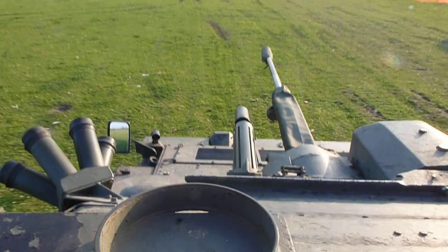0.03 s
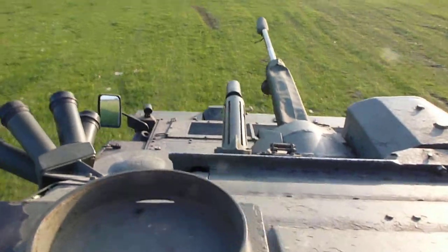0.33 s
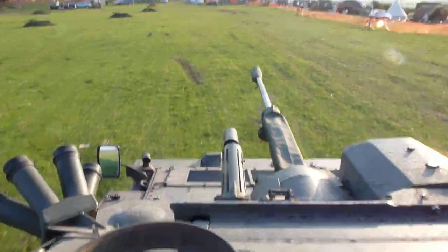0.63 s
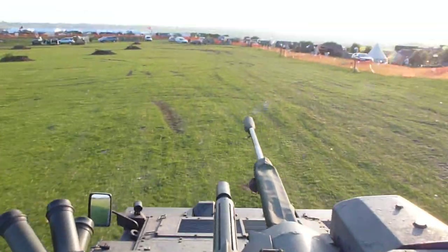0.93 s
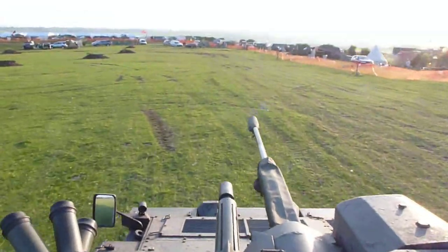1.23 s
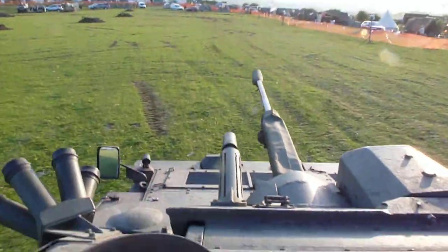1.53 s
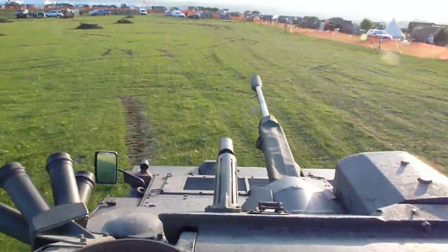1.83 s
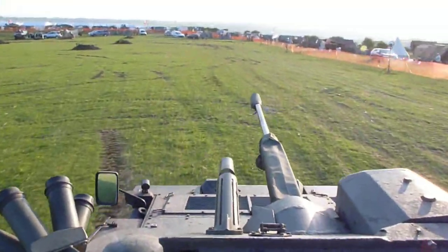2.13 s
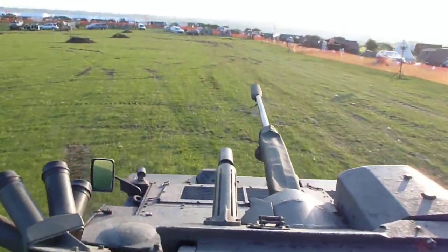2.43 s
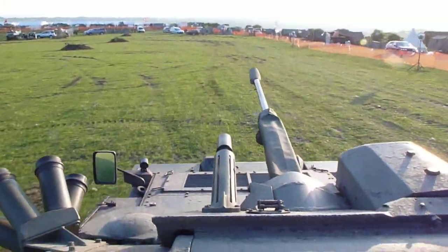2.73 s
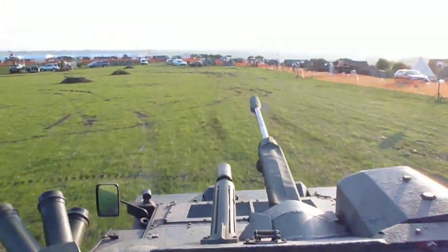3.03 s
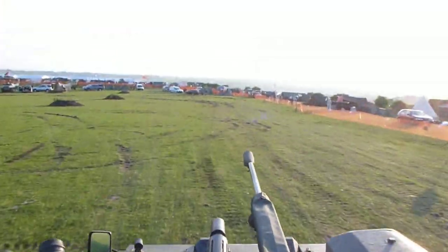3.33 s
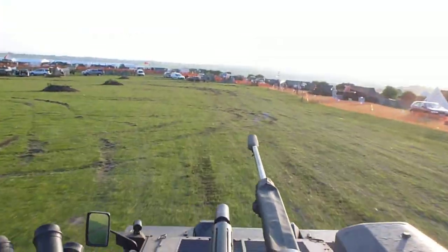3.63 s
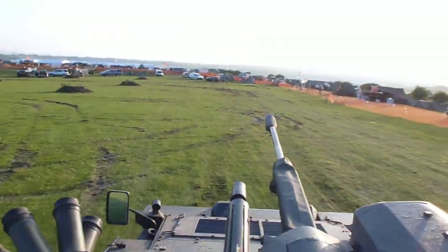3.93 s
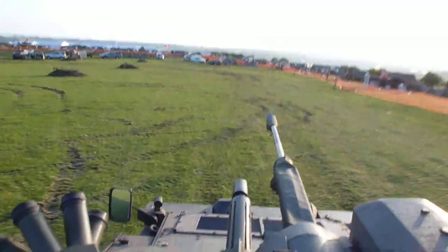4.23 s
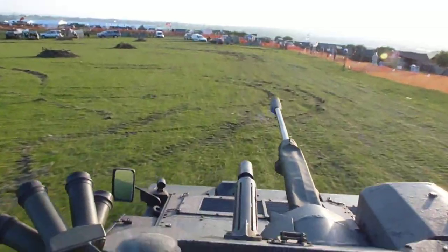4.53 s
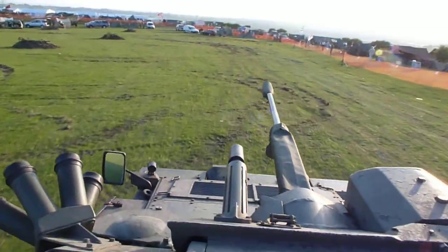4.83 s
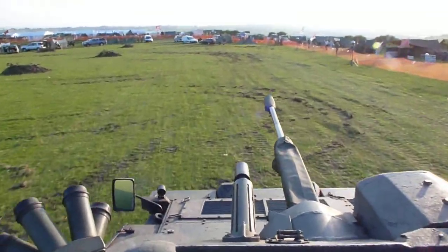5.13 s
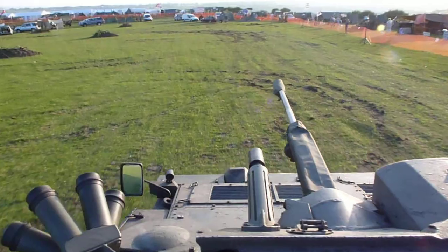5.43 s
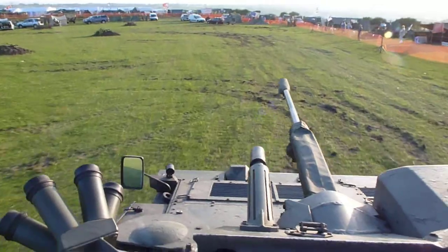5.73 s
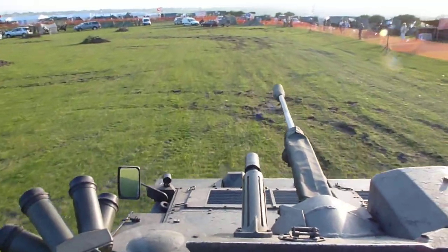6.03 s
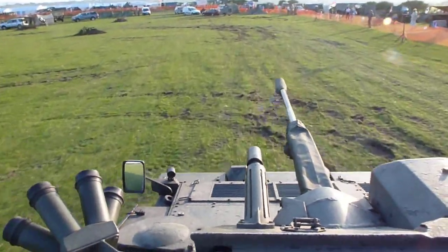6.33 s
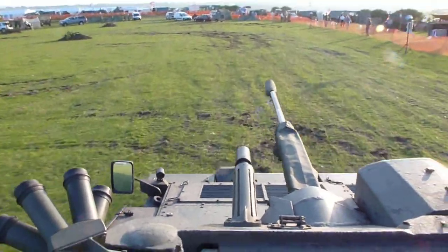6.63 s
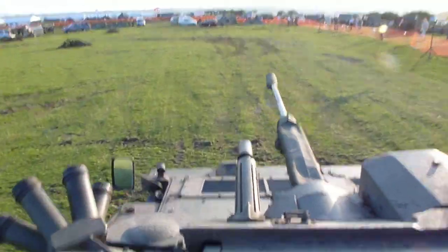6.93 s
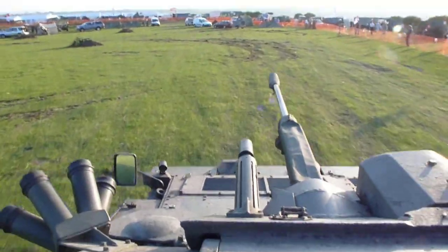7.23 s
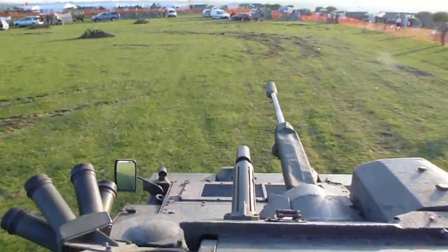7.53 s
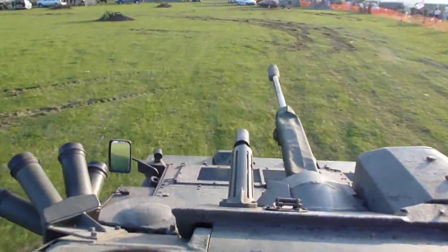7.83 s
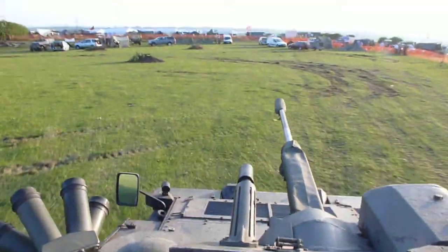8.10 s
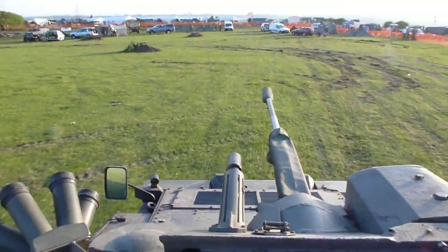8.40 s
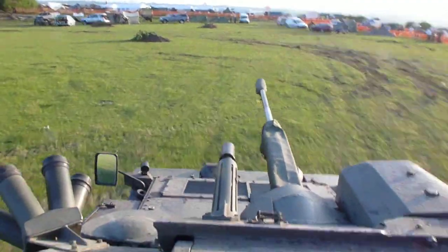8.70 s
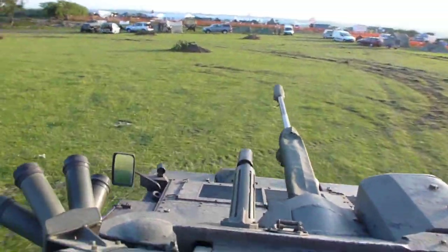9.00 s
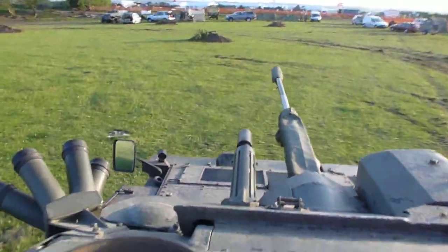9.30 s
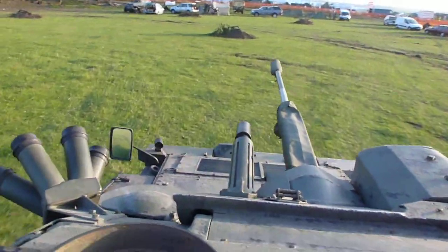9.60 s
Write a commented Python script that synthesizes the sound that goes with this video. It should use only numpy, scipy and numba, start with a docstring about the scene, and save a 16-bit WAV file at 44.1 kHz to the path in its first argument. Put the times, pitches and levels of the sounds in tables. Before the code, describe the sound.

Heard from on board, a tank's deep engine rises and falls over rumbling, clanking tracks and gusts of wind on the microphone.

```python
"""The engine of a tracked armoured vehicle, heard from the turret top as it crosses a bumpy field.
Its firings make a deep exhaust note that speeds up, burbles off load and then pulls again.
Gear teeth whine, and the tracks rattle and clank through the hull, scrape on soil and squeal.
Wind buffets the microphone, and the strongest gusts make its gain control turn the sound down."""
import sys
import numpy as np
from scipy import signal
from scipy.fft import rfft, irfft, next_fast_len
from scipy.io import wavfile
from scipy.ndimage import uniform_filter1d, map_coordinates
from numba import njit

SR = 44100
rng = np.random.default_rng(int(sys.argv[2]) if len(sys.argv) > 2 else 0)


def wrap_up_sound(samples):
    """Save the sound to the file named by the first command line argument, as 16-bit audio."""
    columns = np.atleast_2d(samples).T
    # keep every value between -1 and 1, then stretch to whole-number steps
    tamed = np.clip(columns, -1, 1)
    steps = np.round(tamed * 32767).astype(np.int16)
    wavfile.write(sys.argv[1], SR, steps)


N = 426006

# engine speed: t/s, firing rate/Hz
FIRING_RATE = [(0, 78.7), (.8, 79), (1.4, 86.6), (1.75, 89), (2.0, 91.5), (2.1, 93.7), (2.28, 95.4),
               (2.45, 98), (2.85, 102), (3.05, 100), (3.3, 99.2), (3.72, 111.4), (3.87, 112.4),
               (4.08, 105.7), (4.3, 108.5), (4.58, 114), (4.8, 114.5), (5.2, 112), (5.7, 110), (6.2, 104.6),
               (7.0, 99), (8.2, 92), (8.9, 91.7), (9.1, 90.3), (9.66, 88.6)]
# how hard the engine works: t/s, load from 0 to 1
ENGINE_LOAD = [(0, 0.25), (.85, 0.64), (1.1, 0.7), (1.8, 0.71), (2.3, 0.86), (2.95, 0.69), (4.1, 0.85),
               (4.7, 0.88), (4.88, 0.06), (5.5, 0.46), (6.2, 0.42), (7.8, 0.4), (8.3, 0.3), (8.95, 0.69),
               (9.66, 0.6)]
# exhaust tones: multiple of the firing rate, level when even/dB, level when lumpy/dB
EXHAUST_TONES = [(.5, -9, -4), (1, 1.5, -7), (1.5, -5, -.5), (2, -2, -6.5), (2.5, -7, -7), (3, -13, -16.5)]
# how the silencer favours some pitches: f/Hz, gain/dB
SILENCER_GAIN = [(40, -14.5), (51, -5.5), (80, 4.5), (108, 1), (119, 2), (138, -7.5), (158, -4),
                 (172, -0.5), (186, 1.5), (203, -3.5), (216, -2), (228, -5), (250, -4.5), (330, -14)]
# where gas rings in the silencer: f/Hz, width/Hz, gain/dB
BURBLE_MODES = [(92, 32, -4), (179, 44, 2), (236.3, 32, 1)]
# gear pairs sing out: peak t/s, half length/s, low pair/dB, middle pair/dB, high pair/dB
GEAR_WHINES = [(1.93, .13, -58, -53, -62), (2.22, .11, -56, -44.5, -52.5), (2.52, .18, -55, -49, -56),
               (3.15, .25, -54, -51.5, -59), (3.66, .2, -43.5, -60, -68), (4.12, .12, -46, -62, -68),
               (4.53, .14, -42, -60, -70), (8.7, .28, -56, -46, -52), (9.3, .25, -58, -50, -60)]
# where the hull plates ring: f/Hz, width/Hz, gain/dB
HULL_MODES = [(400, 48, 8.5), (533, 9.7, 7.5), (583, 17, 7.5), (766, 32, 10), (934, 52, 11.5),
              (1303, 70, 5.5), (1433, 49, 6), (1910, 72, -0.5), (2086, 69, -2), (3120, 25, -14)]

# how loud the tracks run: t/s, rolling level/dB, link clatter level/dB
TRACK_LEVELS = [(0, -35.5, -44), (.9, -32.5, -44), (1.4, -38.5, -46), (2.3, -36, -43.5), (3.1, -41, -45),
                (3.45, -39, -51), (3.72, -37, -46.5), (3.95, -36, -51), (5.1, -38.5, -49),
                (6.25, -35, -44.5), (6.65, -37, -50.5), (7.15, -35.5, -44.5), (8.9, -34, -41.5),
                (9.66, -36, -48)]
# deep rumble of the wheels: f/Hz, level/dB
RUMBLE_SPECTRUM = [(20, -24.5), (35, -11), (50, -3), (68, -5.5), (90, 3.5), (130, -0.5), (180, 2),
                   (245, -2), (310, -11.5), (500, -20.5), (1000, -66.5)]
# wheels rolling on the track: f/Hz, level/dB
ROLLING_SPECTRUM = [(100, -11.5), (250, -4.5), (380, 4.5), (550, -1.5), (850, -5), (1120, -10),
                    (1700, -17.5), (3000, -24), (7000, -55)]
# scraping soil: f/Hz, level/dB
SCRAPE_SPECTRUM = [(700, 1.5), (2000, -4), (3200, 1), (4200, -1.5), (5300, -8.5), (6400, -15), (7300, -22)]
# clods grind through the tracks: peak t/s, half length/s, level/dB
CLOD_SCRAPES = [(.43, .022, -46), (.475, 0.045, -46.5), (.6, .05, -53), (.75, 0.041, -46), (.94, .04, -55),
                (1.3, 0.22, -63.5), (2.05, .03, -59), (2.21, .03, -54), (2.33, 0.028, -51),
                (2.44, .03, -57), (2.58, .03, -56), (2.94, .05, -55.5), (3.09, 0.04, -54),
                (3.21, .035, -56), (3.33, .04, -60), (3.76, 0.026, -53.5), (4.2, 0.26, -60.5),
                (4.7, 0.14, -58.5), (5.29, 0.05, -56), (5.55, .025, -58), (5.66, .025, -56),
                (5.76, 0.05, -52.5), (5.86, .05, -56), (6.015, .02, -52), (6.1, 0.035, -47.5),
                (6.185, .018, -53.5), (6.265, 0.03, -49.5), (6.66, .022, -53.5), (6.775, 0.028, -48.5),
                (6.845, 0.016, -49), (7.11, .04, -56), (7.19, 0.043, -43.5), (7.37, 0.035, -55),
                (8.3, 0.16, -64), (8.765, 0.04, -48)]
# the track slaps the hull: t/s, decay/s, level/dB
TRACK_SLAPS = [(7.03, 0.01, -32), (7.105, 0.02, -34), (7.15, 0.016, -31), (7.867, 0.012, -32),
               (8.194, 0.012, -33), (9.204, 0.008, -30.5)]
# force of a slap: f/Hz, level/dB
SLAP_SPECTRUM = [(200, -4.5), (500, 5), (950, 17), (2000, -7), (5000, -21.5)]
# links clink on their pins: t/s, decay/s, level/dB
LINK_CLINKS = [(6.28, .03, -47), (6.375, .025, -45), (6.5, .02, -46), (6.64, .035, -45), (6.83, .03, -47),
               (7.255, .02, -45), (7.3, .02, -43.5), (7.41, .02, -46), (7.915, .035, -44),
               (7.99, .025, -47), (8.3, .025, -44), (8.63, .03, -42), (8.92, .035, -43), (9.15, .03, -43)]
# force of a clink: f/Hz, level/dB
CLINK_SPECTRUM = [(1000, -6), (2200, 0), (2800, -9), (4400, -13), (5400, -20)]
# where the track pins ring: f/Hz, width/Hz, gain/dB
PIN_MODES = [(2115, 60, -4), (2185, 50, -4), (2505, 35, -7), (2810, 55, -5), (3370, 60, -8), (3500, 40, -7),
             (3605, 25, -7), (4400, 70, -7), (5352, 28, -1.5)]
# bumps shake the hull: t/s, decay/s, level/dB
HULL_BUMPS = [(7.19, .07, -27.5), (7.52, .06, -28), (8.2, .05, -31), (9.47, .06, -30)]
# force of a bump: f/Hz, level/dB
BUMP_SPECTRUM = [(60, -14), (120, 0), (200, -14), (500, -40), (2000, -70)]
# the hull's lowest note: f/Hz, width/Hz, gain/dB
BOOM_MODE = [(116, 28, 0)]
# dry pins bind and squeal: peak t/s, half length/s, level/dB
PIN_SQUEALS = [(1.7, .35, -66), (2.45, .22, -61), (3.1, .3, -62), (7.95, .15, -62), (8.35, .12, -59),
               (8.63, .1, -56), (8.9, .11, -51.5), (9.17, .08, -58), (9.45, .15, -62)]
# pitches of a squeal: f/Hz, width/Hz, gain/dB
SQUEAL_MODES = [(2115, 170, -4), (2820, 100, 0), (3500, 60, -4.5), (4400, 100, -4), (5352, 50, -7.5)]

# gusts hit the microphone: t/s, length/s, turbulence/dB, fizz/dB, slow pressure/dB
GUSTS = [(0.019, 0.011, -31, -45, -27.5), (0.2, 0.02, -22.5, -46.5, -11.5),
         (0.254, 0.029, -24.5, -41.5, -24), (0.302, 0.059, -22.5, -39, -32.5),
         (0.367, .135, -24.5, -41, -41.5), (0.508, 0.038, -22.5, -44, -38), (0.559, 0.035, -21.5, -41, -34),
         (0.602, 0.011, -25.5, -42.5, -32), (0.643, 0.044, -21, -37.5, -29.5),
         (0.69, 0.033, -19.5, -37.5, -23), (0.747, 0.024, -20.5, -43, -25),
         (1.584, 0.027, -27, -42.5, -14.5), (2.604, 0.06, -23.5, -42, -22.5), (4.185, 0.037, -30, -49, -15),
         (4.208, 0.0098, -20, -32.5, -21.5), (4.698, 0.023, -20.5, -39.5, -18.5),
         (4.749, 0.025, -21, -34.5, -20), (4.784, 0.055, -27.5, -38, -15.5), (5.73, 0.11, -36, -50.5, -30),
         (7.131, 0.054, -39.5, -55, -18), (7.189, 0.055, -28, -43.5, -32),
         (7.498, 0.049, -22.5, -48.5, -27.5), (7.616, 0.034, -23, -41, -13.5),
         (7.694, 0.028, -26.5, -40.5, -36), (9.054, 0.01, -21, -55, -25), (9.512, 0.0084, -24, -43, -18),
         (9.61, 0.023, -28.5, -54.5, -32)]
# low flutter of the wind: f/Hz, level/dB
WIND_SPECTRUM = [(30, -12.5), (120, 3.5), (250, 4), (500, 1), (800, -4.5), (1300, -12), (2000, -36.5),
                 (3500, -49.5), (7000, -66.5)]
# fizz of a gust: f/Hz, level/dB
FIZZ_SPECTRUM = [(200, -8), (700, -1), (1800, 0), (2700, -6), (3800, -17), (5400, -31), (7000, -44)]
# eddies (small swirls of air) burst: t/s, crackle decay/s, crackle/dB, thump/dB, slow push/dB
EDDY_POPS = [(0.265, 0.0034, -35, -23, -30), (0.308, 0.0054, -31, -18, -36), (.336, 0.0073, -25, -29, -33),
             (0.445, 0.0034, -29.5, -18, -39), (.567, .004, -31.5, -17, -34),
             (0.653, 0.0022, -28, -12, -25), (0.673, .003, -32, -15, -38), (0.702, 0.01, -26.5, -21, -38),
             (0.752, .004, -35, -14, -32.5), (1.595, 0.0045, -41, -27, -26),
             (4.217, .007, -20.5, -13.5, -21), (4.753, 0.0075, -30, -14, -21),
             (7.208, .003, -29.5, -10, -35.5), (7.549, 0.0024, -33.5, -8.5, -24),
             (7.626, 0.0022, -28.5, -14, -35), (7.644, 0.004, -21.5, -10, -20),
             (9.203, 0.0018, -32.5, -19, -35), (9.512, 0.0028, -25.5, -12, -28),
             (9.614, 0.0022, -37, -23, -34)]
# crackle of a pop: f/Hz, level/dB
CRACKLE_SPECTRUM = [(200, -6), (700, 0), (1700, 0), (2300, -11), (3200, -18), (4500, -30), (7000, -46)]
# the two hardest wind pops snap brightly: t/s, decay/s, level/dB
POP_SNAPS = [(4.217, .004, -31), (7.644, .0025, -23.5)]
# bright snap of a pop: f/Hz, level/dB
SNAP_SPECTRUM = [(500, -8), (2000, 0), (3000, -3), (4500, -13), (7000, -24)]


def engine(firings, firing_hz, load, coast_db=-36.5, full_load_db=-27):
    """Exhaust tones pass through the silencer: firm under load, lumpy and unsteady when coasting."""
    load_db = coast_db + load * (full_load_db - coast_db)
    lumpy = 1 - load ** 2
    note = 0
    for multiple, even_db, lumpy_db in EXHAUST_TONES:
        wobble_db = (.7 + 2.2 * lumpy) * wander(14)
        stagger = .08 * lumpy ** 2 * wander(14) + .003 * multiple ** 3 * wander(35)
        silencer_db = np.interp(multiple * firing_hz, *np.transpose(SILENCER_GAIN))
        tone_db = even_db + lumpy * (lumpy_db - even_db) + wobble_db + silencer_db
        cycles = multiple * firings + stagger + rng.random()
        note = note + undb(tone_db) * np.sin(2 * np.pi * cycles)
    return np.sqrt(2) * note * undb(load_db) + burble(lumpy)


def burble(lumpy, level_db=-37):
    """Unburnt gas burbles in the silencer when the engine is off load."""
    gas = ring(noise(), BURBLE_MODES)
    return ring(gas, BURBLE_MODES) * lumpy * undb(level_db)


def gears(firings, load, teeth_per_firing=(7, 14, 21.3), murmur_db=-52, load_rise_db=1.5):
    """Three gear pairs turn with the engine: they murmur through the hull and whine when pressed hard."""
    murmur, whine = 0, 0
    for pair, teeth in enumerate(teeth_per_firing):
        slack = .075 * wander(140) + .15 * wander(22)  # play between the teeth
        flutter = undb(2.3 * wander(110))
        chatter = .25 * wander(130)
        cycles = teeth * firings + slack
        murmur = murmur + np.sin(2 * np.pi * (cycles + chatter))
        singing = swells([(peak, length, levels[pair]) for peak, length, *levels in GEAR_WHINES])
        whine = whine + unit(flutter * np.sin(2 * np.pi * cycles)) * singing
    return ring(murmur, HULL_MODES) * undb(murmur_db + load_rise_db * load) + whine


def tracks(firings, roll_db, clatter_db, shake_db=.5):
    """Wheels rumble and roll, links knock and soil scrapes, while the engine shakes the hull."""
    shake = undb(shake_db * (np.sin(2 * np.pi * firings) + np.sin(np.pi * firings)))
    rumble = colour(noise(), RUMBLE_SPECTRUM)
    rumble *= undb(-31 + .5 * (roll_db - roll_db.mean()) + .77 * wander(1.7))
    rolling = colour(knocks(2500, spread_db=2.1), ROLLING_SPECTRUM)
    rolling *= undb(roll_db + 1 + .78 * wander(31))
    blows = lowpass(knocks(600, spread_db=2.4), hz=3500, order=2)
    links = ring(blows, HULL_MODES) * undb(clatter_db + 2.1 * wander(27))
    return rumble + shake * (rolling + links + soil_scrape())


def soil_scrape(steady_db=-55):
    """Grit scrapes over the pins and makes them ring, louder when a clod grinds through."""
    grit = colour(knocks(7000, spread_db=2.6), SCRAPE_SPECTRUM)
    ringing = undb(-21 + 4 * wander(8)) * ring(grit, PIN_MODES)
    return (grit + ringing) * (undb(steady_db) + swells(CLOD_SCRAPES)) * undb(1.2 * wander(45))


def clanks():
    """Slack track slaps the hull, links clink on their pins and bumps make the hull boom."""
    slaps = strikes(TRACK_SLAPS, SLAP_SPECTRUM, HULL_MODES)
    clinks = strikes(LINK_CLINKS, CLINK_SPECTRUM, PIN_MODES)
    booms = strikes(HULL_BUMPS, BUMP_SPECTRUM, BOOM_MODE)
    return slaps + clinks + booms


def strikes(hits, spectrum, modes, crack_db=-3):
    """Each blow makes a dry crack and sets the struck part ringing."""
    contact = bursts(hits)
    crack = shaped(noise(), contact, spectrum)
    return undb(crack_db) * crack + ring(crack, modes) * rms(contact)


def pins(clatter_db, squeak_db=-60):
    """Dry pins stick and slip in short fits, each at its own pitch, and squeal when they bind."""
    fits = undb(2.6 * wander(22))
    slips = lowpass(knocks(2500, spread_db=1.8) * fits, hz=2900, order=3)
    squeak = waver(ring(slips, PIN_MODES), share=.009, rate=14)
    squeak *= undb(squeak_db + clatter_db - clatter_db.mean())  # livelier when the links clatter
    squeal = ring(ring(noise(), SQUEAL_MODES), SQUEAL_MODES)
    return squeak + squeal * swells(PIN_SQUEALS)


def wind(breeze_db=-40.5, attack_s=.0058, release_s=.011, slap_db=-7.5, slap_s=.002, push_s=.032):
    """A breeze flutters on the microphone; each gust slaps it, fizzes and presses on it slowly."""
    t = np.arange(N) / SR
    gust_gain, fizz_gain, pressure = 0, 0, 0
    for start, length, turbulence_db, fizz_db, pressure_db in GUSTS:
        age = np.maximum(t - start, 0)
        swell = np.minimum(age / attack_s, 1) * np.exp(-np.clip((age - length) / release_s, 0, 20))
        slap = bursts([(start, slap_s, slap_db)])
        gust_gain = gust_gain + swell * undb(turbulence_db)
        fizz_gain = fizz_gain + (swell + slap) * undb(fizz_db)
        pressure = pressure + swell * undb(pressure_db)
    ragged = undb(1.8 * wander(90))
    turbulence = undb(breeze_db + 3.2 * wander(30)) + ragged * gust_gain
    flutter = turbulence * colour(knocks(2600, spread_db=1), WIND_SPECTRUM)
    fizz = shaped(knocks(3400, spread_db=.6), ragged * fizz_gain, FIZZ_SPECTRUM)
    slow_push = uniform_filter1d(pressure, int(push_s * SR))
    return flutter + fizz + slow_push


def wind_pops(thump_rise_s=.00068, push_rise_s=.0065):
    """An eddy bursts on the microphone: a thump of suction, a crackle, then a slow push."""
    t = np.arange(N) / SR
    pressure = 0
    for start, _, _, thump_db, push_db in EDDY_POPS:
        for size_db, rise_s in ((thump_db, thump_rise_s), (push_db, push_rise_s)):
            age = np.clip((t - start) / rise_s, 0, 20)
            pressure = pressure - undb(size_db) * (age * np.exp(1 - age)) ** 2
    crackle_gain = bursts([row[:3] for row in EDDY_POPS])
    return pressure + shaped(noise(), crackle_gain, CRACKLE_SPECTRUM)


def pop_snaps():
    """The two hardest wind pops snap brightly."""
    return shaped(noise(), bursts(POP_SNAPS), SNAP_SPECTRUM)


def undb(db):
    """Turn decibels into a gain to multiply by."""
    return 10 ** (np.asarray(db) / 20)


def rms(x):
    """The average strength of x (root mean square)."""
    return np.sqrt(np.mean(x ** 2))


def unit(x):
    """Scale x to a strength of 1."""
    return x / rms(x)


def noise():
    """Plain white hiss."""
    return rng.standard_normal(N)


def knocks(rate, spread_db):
    """About rate tiny random impacts a second, of uneven size; strength 1."""
    size = undb(spread_db * np.minimum(rng.exponential(size=N), 4))
    return unit((rng.random(N) < rate / SR) * size * np.sign(noise()))


def wander(rate):
    """A smooth random curve of strength 1 that changes about rate times a second."""
    window = max(int(SR / rate), 1)
    smoothed = uniform_filter1d(noise(), window, mode="wrap")
    return unit(uniform_filter1d(smoothed, window, mode="wrap"))


def waver(x, share, rate):
    """Let the pitch of x drift by a small share, about rate times a second."""
    return map_coordinates(x, [np.cumsum(1 + share * wander(rate))], mode="mirror")


def curves(table):
    """Join a table's points in time: one curve for each column after the first."""
    times, *columns = np.transpose(table)
    return [np.interp(np.arange(N) / SR, times, column) for column in columns]


def swells(rows):
    """A gain that rises and falls smoothly around each peak."""
    t = np.arange(N) / SR
    return sum(undb(db) * np.exp(-np.minimum(((t - peak) / half_length) ** 2, 40))
               for peak, half_length, db in rows)


def bursts(rows):
    """A gain that jumps up at each start and dies away."""
    t = np.arange(N) / SR
    return sum((t >= start) * undb(db) * np.exp(-np.clip((t - start) / decay, 0, 20))
               for start, decay, db in rows)


def colour(x, spectrum):
    """Set the balance of low and high pitches in x; strength 1."""
    size = next_fast_len(N, True)
    hz, db = np.transpose(spectrum)
    bin_hz = np.maximum(np.fft.rfftfreq(size, 1 / SR), 1)
    gain = undb(np.interp(np.log(bin_hz), np.log(hz), db))
    return unit(irfft(rfft(x, size) * gain, size)[:N])


def shaped(x, gain, spectrum):
    """Apply the gain first and the spectrum after, so even a sudden start stays dull."""
    return colour(x * gain, spectrum) * rms(gain)


def ring(x, modes):
    """Play x through modes, the pitches at which a part rings; strength 1."""
    return unit(sum(undb(db) * signal.lfilter(*signal.iirpeak(hz, hz / width, SR), x)
                    for hz, width, db in modes))


def lowpass(x, hz, order):
    """Soften everything above hz; a higher order cuts more steeply."""
    return signal.sosfilt(signal.butter(order, hz, fs=SR, output="sos"), x)


@njit
def follow(x, attack, release):
    """Follow the level of x, rising at the attack speed and sinking at the release speed."""
    out, level = np.empty(len(x)), 0.
    for i in range(len(x)):
        level += (x[i] - level) * (attack if x[i] > level else release)
        out[i] = level
    return out


def scene():
    """The microphone rides on the vehicle and stands in the wind; one channel."""
    firing_hz, = curves(FIRING_RATE)
    load = np.clip(curves(ENGINE_LOAD)[0], 0, 1)
    roll_db, clatter_db = curves(TRACK_LEVELS)
    firings = np.cumsum(firing_hz * (1 + .003 * wander(12))) / SR  # count of firings so far
    drive = engine(firings, firing_hz, load) + gears(firings, load) + tracks(firings, roll_db, clatter_db)
    snaps = pop_snaps()
    return (drive + clanks() + pins(clatter_db) + wind() + wind_pops() + snaps)[None]


def record(dry, attack_s=.025, release_s=.58, threshold_db=-19, low_cut_hz=32, dull_hz=6600, top_hz=7200):
    """Gain control dips after gusts, a wind filter removes slow pressure, and the treble is cut."""
    level = follow(np.abs(dry[0]), 1 / (attack_s * SR), 1 / (release_s * SR))
    ducked = dry / np.maximum(level / undb(threshold_db), 1)
    filtered = signal.sosfilt(signal.butter(4, low_cut_hz, "high", fs=SR, output="sos"), ducked)
    rounded = np.tanh(filtered)  # softens the peaks
    dulled = lowpass(rounded, dull_hz, order=10)
    return signal.sosfilt(signal.ellip(8, .2, 80, top_hz, fs=SR, output="sos"), dulled)


dry = scene()
out = record(dry)
wrap_up_sound(out)
```